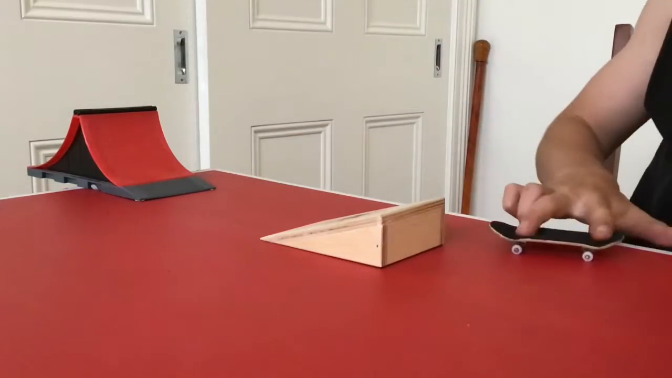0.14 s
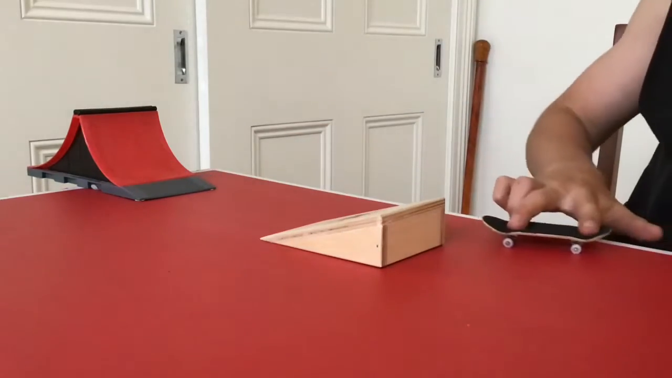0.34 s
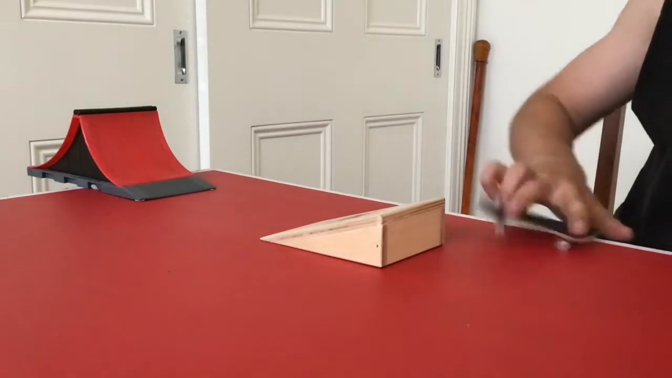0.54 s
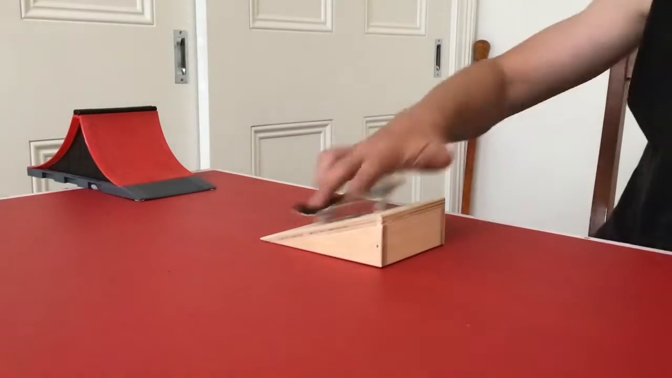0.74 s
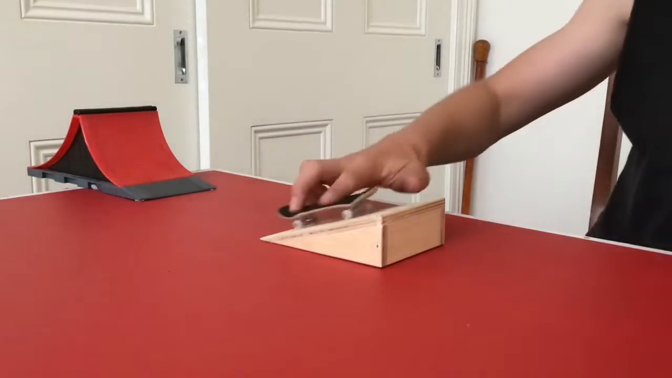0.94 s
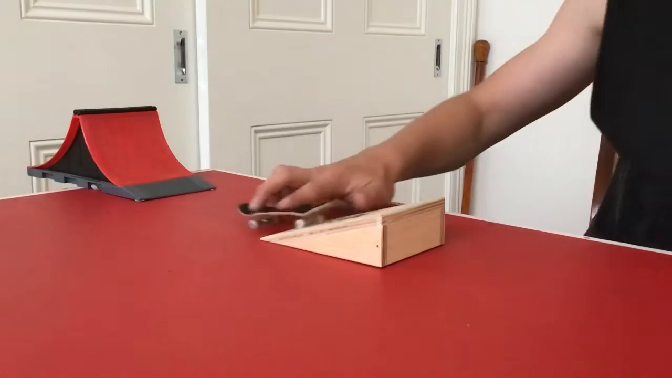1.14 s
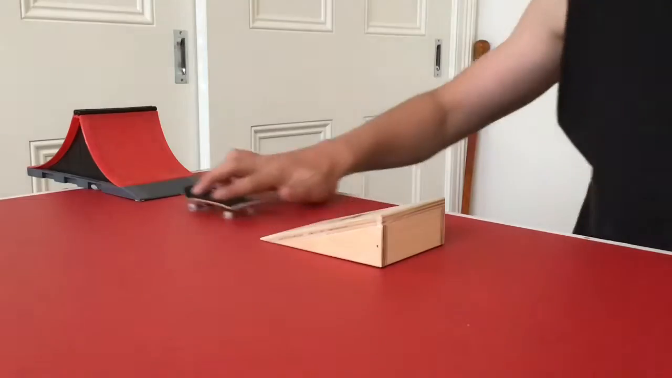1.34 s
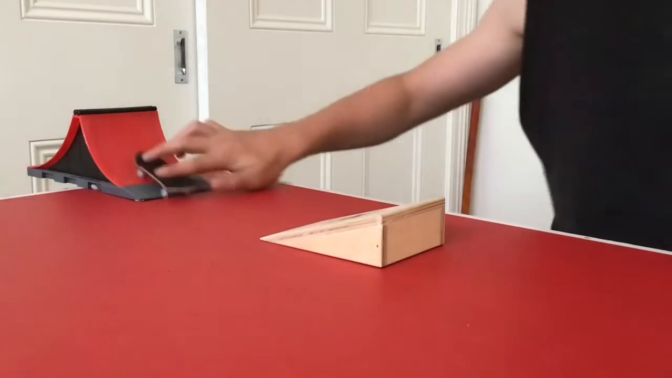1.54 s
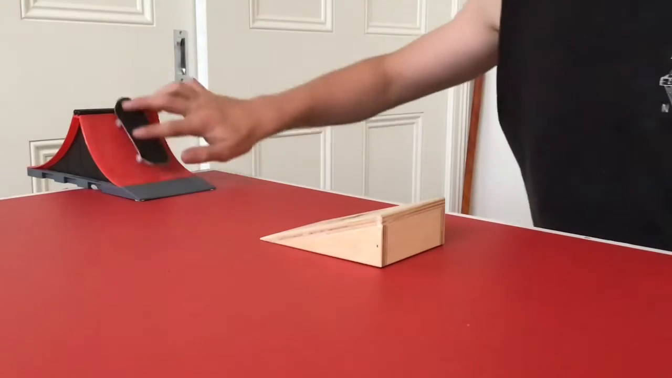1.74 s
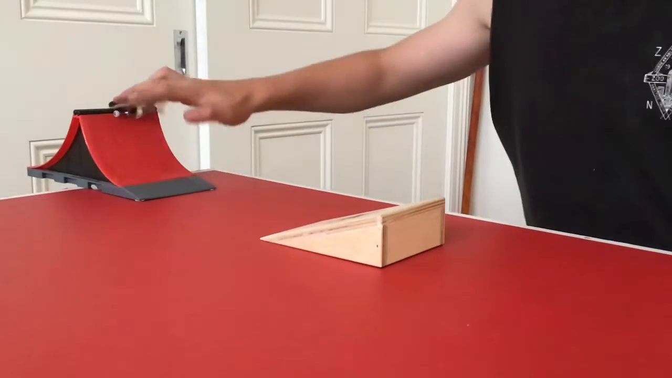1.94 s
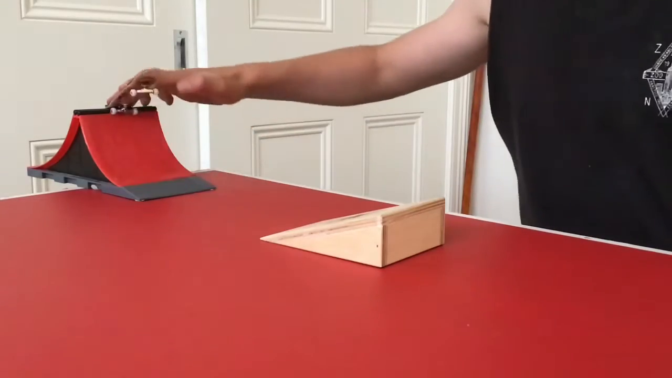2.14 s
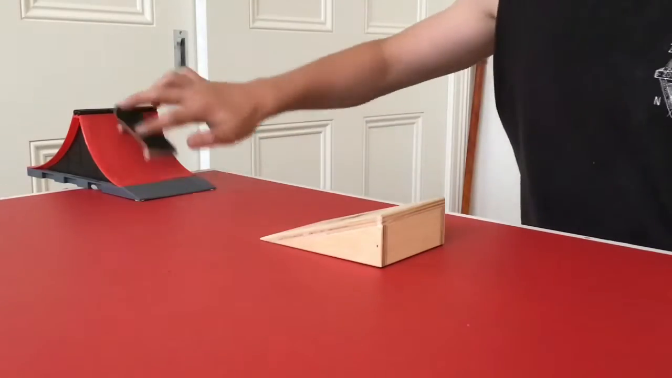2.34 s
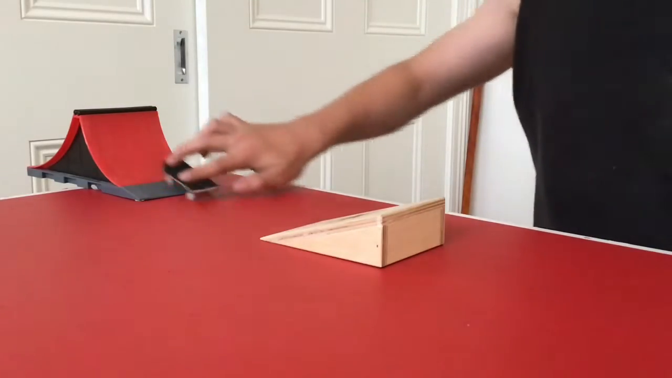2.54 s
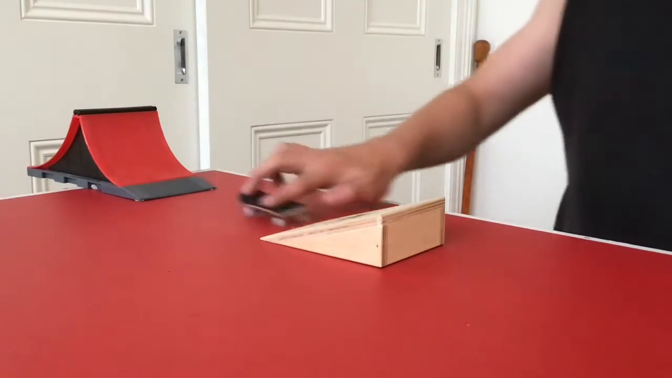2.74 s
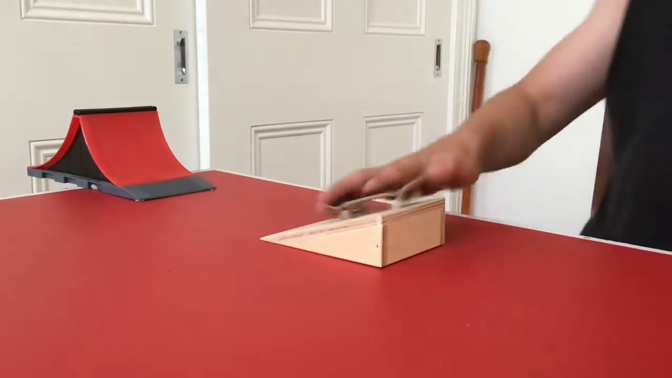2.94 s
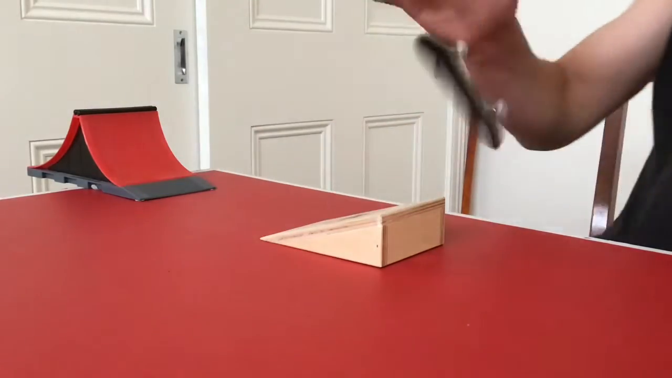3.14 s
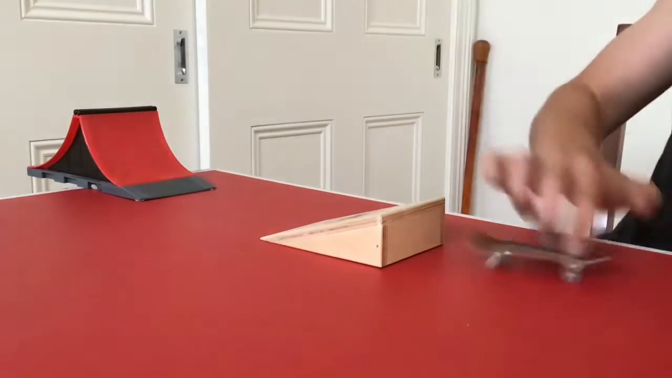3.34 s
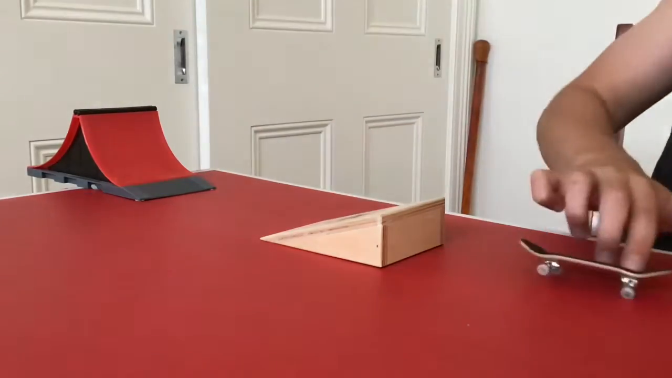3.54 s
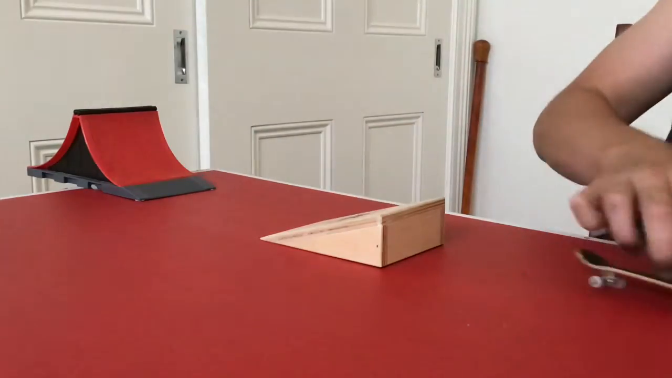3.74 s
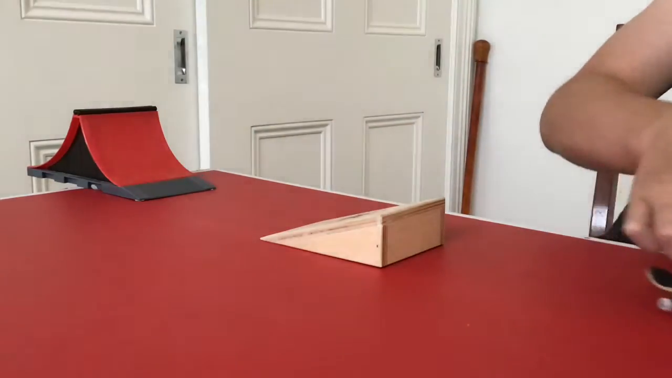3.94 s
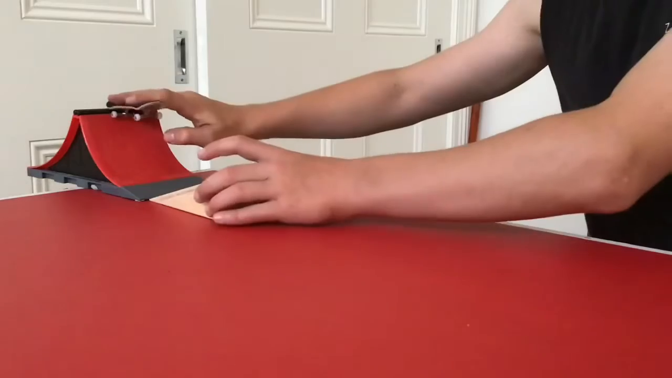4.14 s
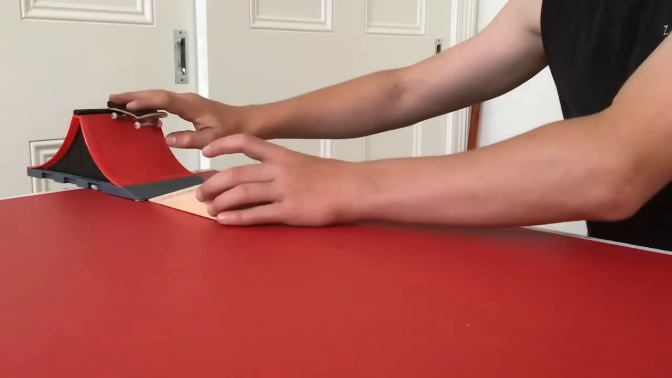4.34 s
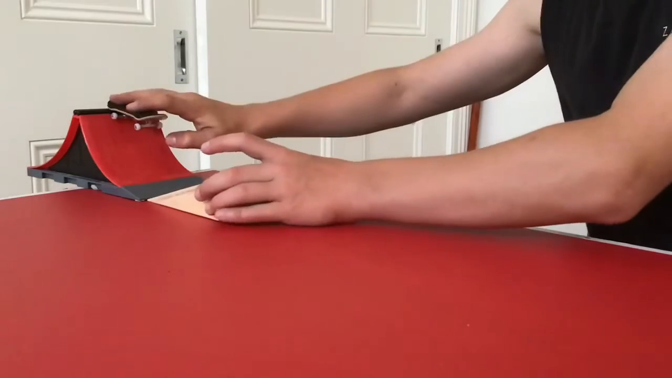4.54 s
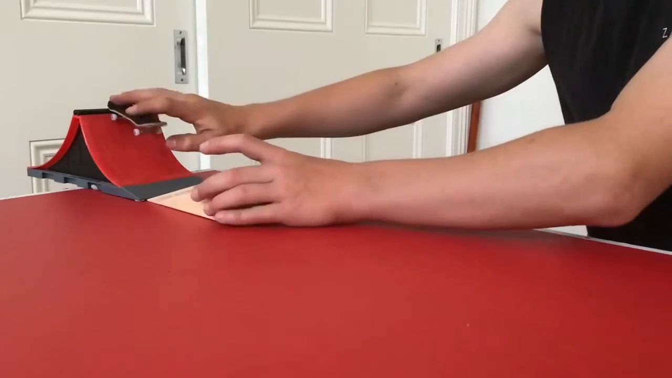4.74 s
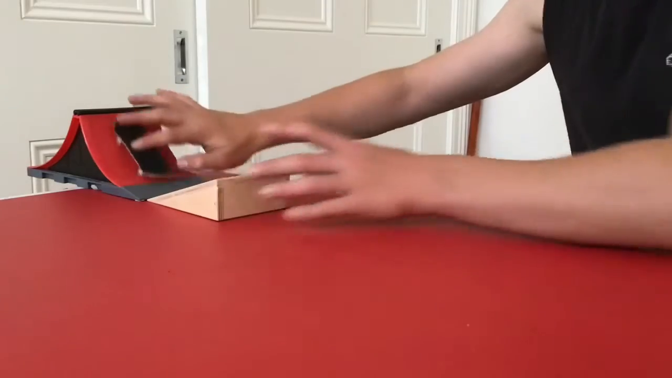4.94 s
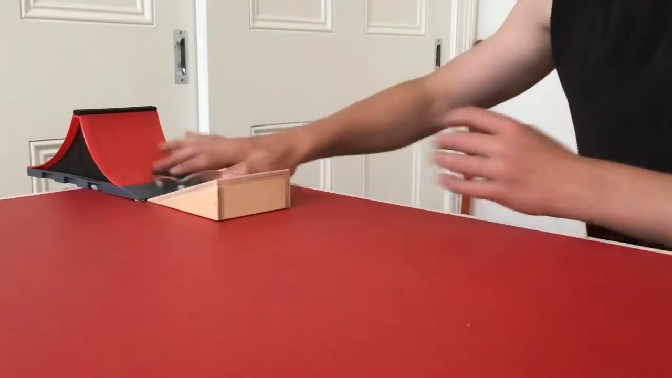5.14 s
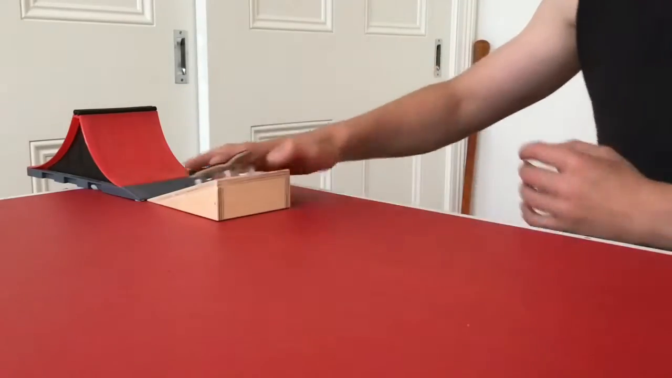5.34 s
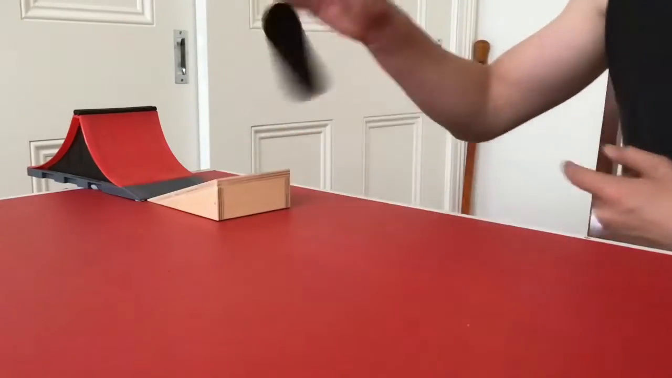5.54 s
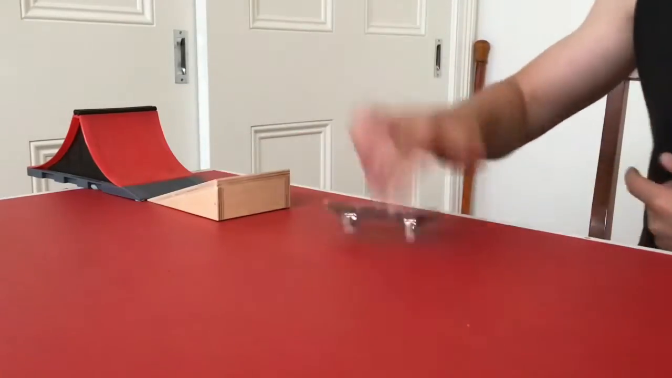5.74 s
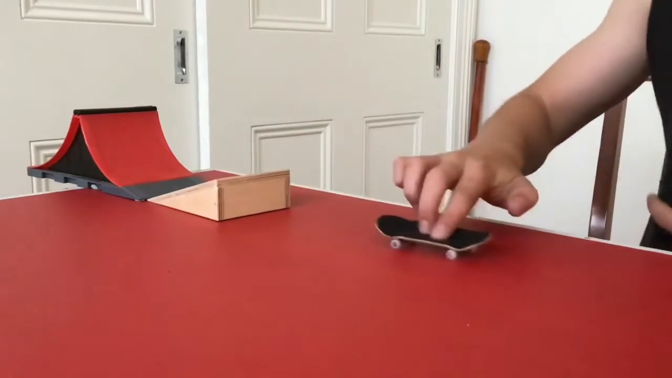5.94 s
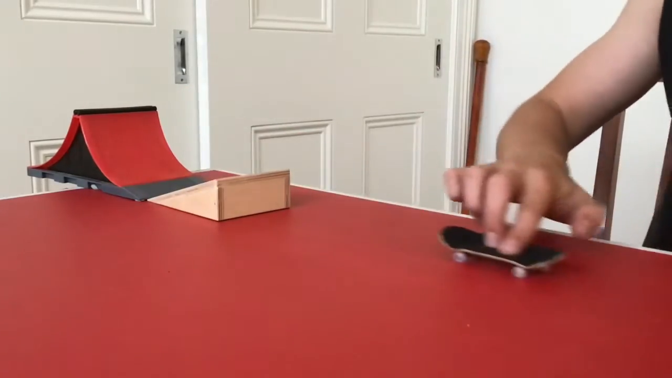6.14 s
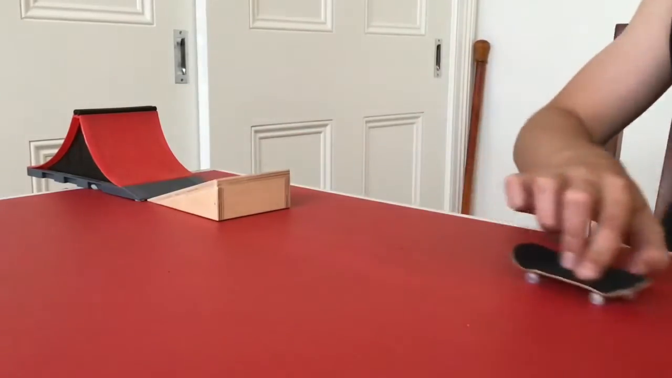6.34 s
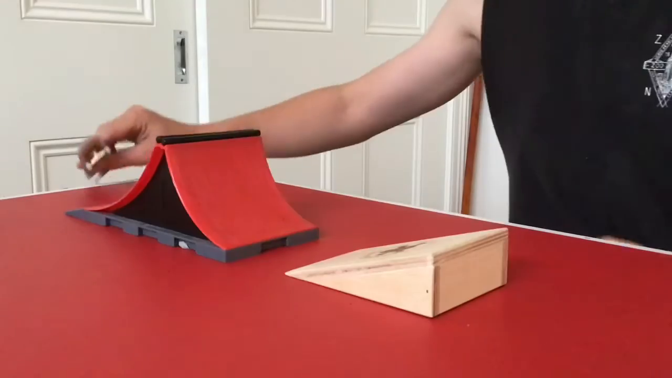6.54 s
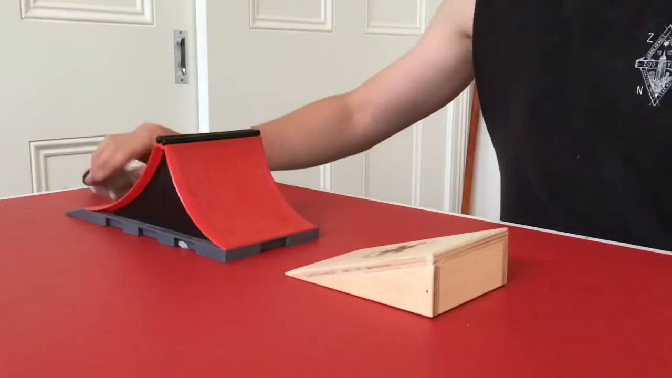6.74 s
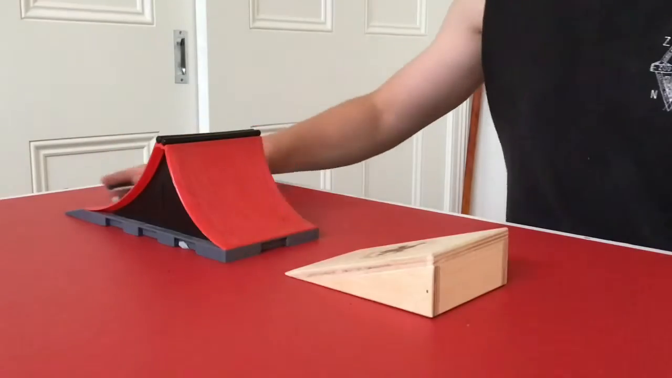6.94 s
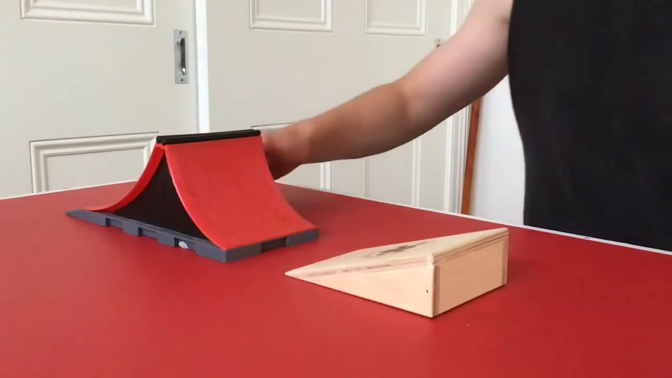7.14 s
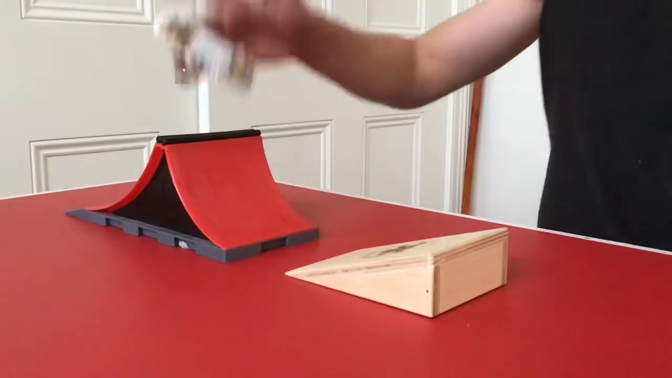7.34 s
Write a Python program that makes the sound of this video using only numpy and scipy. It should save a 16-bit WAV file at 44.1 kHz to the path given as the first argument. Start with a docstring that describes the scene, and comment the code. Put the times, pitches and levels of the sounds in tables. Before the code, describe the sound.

Miniature skateboard wheels hiss and scrape across a table, a wooden wedge and a hollow plastic ramp, heard close with short room echoes. Sharp dry snaps of the tail lead to hard wheel slaps and rapid rattling bounces, once early, once near the middle and loudest later. Between them are light seam ticks, quiet finger rubs and soft thumps. Sound briefly dips between attempts, and the last stretch brings hollow knocks and coarse rolling.

```python
"""A fingerboard rolls over a wooden table, a wooden wedge and a plastic ramp in a small room.
Wheel grit and rubs, and every pop, landing, bounce, seam, knock and thump, shake the same six bodies:
table top, wedge, ramp, deck, metal trucks and bare contact fizz. Each body rings at its own pitches.
A small room answers with echoes, over a low steady murmur of the house.
Three times the level dips briefly and comes back."""
import sys
import numpy as np
from scipy import signal
from scipy.fft import rfft, irfft, next_fast_len
from scipy.io import wavfile
from scipy.ndimage import uniform_filter1d, map_coordinates

SR = 44100
rng = np.random.default_rng(int(sys.argv[2]) if len(sys.argv) > 2 else 0)


def inscribe(sig):
    """Save sig as 16-bit PCM at rate SR to the path in sys.argv[1].

    A 1-D sig is mono; a 2-D sig holds one channel per row.
    Samples are clipped to [-1, 1] before scaling.
    """
    pcm = np.round(np.clip(np.atleast_2d(sig).T, -1, 1) * 32767)
    wavfile.write(sys.argv[1], SR, pcm.astype(np.int16))


N = 325458
TIME = np.arange(N) / SR  # s

# murmur of the house, its tone colour: f/Hz, level per Hz/dB
AIR = [(20, -45), (34, -23), (50, -9), (70, -5), (150, -13.5), (400, -22), (800, -29), (1100, -32.5),
       (2500, -34), (6000, -39.5), (13000, -45), (16000, -48)]
# how long the room rings at each pitch: f/Hz, time to fall by 60 dB t60/s
ROOM = [(100, 0.39), (260, 0.17), (700, 0.39), (1840, 0.33), (4850, 0.31), (12800, 0.24)]
# moments when all echoes stop, at the bottom of two of the dips: t/s
BREAKS = [4.106, 6.54]
# brief dips of the whole sound: t/s, gain/dB
FADES = [(0, 1.5), (.05, -5.5), (.09, -6.5), (.11, -2), (4.085, -0.5), (4.106, -18), (4.125, -5),
         (6.505, 4.5), (6.538, -15.5), (6.56, -3.5)]

# resonances of the six bodies: f/Hz, width/Hz, strength level/dB
TABLE = [(97, 23, -14), (171.7, 79, -9), (242, 79, -5), (305, 50, 0), (402, 150, -4)]
WEDGE = [(517, 118, -5), (604, 69, -2.5), (743, 110, -3)]
RAMP = [(1110, 280, -5.5), (1527, 340, -1), (1998, 560, -1), (2488, 390, -2)]
DECK = [(2804, 230, 3.5), (3374, 500, 1)]
TRUCKS = [(3990, 540, -2.5), (5020, 576, 2), (5520, 700, 0.5), (6570, 1000, -7), (7350, 450, -13)]
FIZZ = [(8400, 3300, -0.5), (13250, 810, 3), (15700, 6200, -5.5)]

# rolling, one table per run: t/s, wheel load as a base level/dB,
# then ramp, metal and table top against the wood, level/dB each
ROLLS = [
    [(0.14, -61, -5, -2, -12), (0.146, -47, -17, -17, -4), (0.156, -60, -6, -20, -2),
     (0.26, -47, -6.5, -26, -12.5), (0.326, -60, 1, -12, -18), (0.338, -50.5, -2, -17, -12),
     (0.366, -53.5, -9.5, -18, -21), (0.456, -54.5, -3.5, -11, -4), (0.556, -60, 0, -27, -6),
     (0.6, -79, -2.5, -34, 0)],
    [(0.96, -62.5, 11.5, -8, -2.5), (1.02, -54, -10, -4.5, -6.5), (1.356, -46.5, -0.5, -8, -4),
     (1.402, -41.5, -5, -9.5, -16), (1.466, -42.5, 0.5, -5.5, -7), (1.538, -39.5, -7, -11, -11),
     (1.59, -37.5, 3.5, -2, -3), (1.748, -40, 3.5, -5, -6), (1.854, -52.5, 8, -12, 1),
     (1.86, -54.5, 2, 7, -11)],
    [(2.33, -63, 2, -6, 3), (2.362, -55.5, -2.5, -15, -6), (2.5, -51.5, 10, 0.5, -3.5),
     (2.578, -36, 4, -9, -11.5), (2.59, -45, 5, -4.5, -5.5), (2.71, -30, 0, -5.5, -9.5),
     (2.72, -35, -9, -15.5, -4.5), (2.846, -44.5, 2.5, -1, -11), (3.014, -40, -11, -15, -5.5),
     (3.09, -53.5, -5, 2, -8.5)],
    [(3.6, -45.5, -8, -14, 2), (3.644, -58, -6, -6, -9.5), (3.722, -41, -18, -23, -1.5),
     (3.728, -55.5, -9, -11, -6), (3.766, -43.5, -15, -16, -6), (3.778, -49, -10, -16, -1.5),
     (3.806, -46.5, -14.5, -15.5, -9.5), (4.018, -47, -7, -12.5, -9.5), (4.09, -48, -7, -13.5, -9.5),
     (4.11, -85, -7, -18, -1)],
    [(4.9, -83.5, 7.5, -4, 4.5), (5.0, -53.5, 3, -9.5, -6.5), (5.194, -37.5, 6.5, -3.5, -7.5),
     (5.218, -36, -4.5, -11.5, -0.5), (5.272, -39.5, 11, -2.5, -8), (5.294, -34.5, 2.5, -7.5, -7.5),
     (5.306, -48, 0, -9, -2), (5.392, -50.5, -2, -10, -2), (5.418, -47, -12, -14, -13),
     (5.49, -50.5, -0.5, -6, -1)],
    [(5.98, -51, 9, -5, -6), (5.988, -52, -4, -17, -7.5), (6.06, -59, -1, -8, -3),
     (6.152, -50, -3, -12, -11.5), (6.252, -55.5, -4, -4.5, -6), (6.294, -51.5, 0.5, -9, -6.5),
     (6.498, -55, -1, -9.5, -5), (6.51, -47.5, -3, -6, -8), (6.532, -55, 1, -18, -7),
     (6.54, -75, -15, -23, -7)],
    [(6.69, -58.5, -1, -10, 1), (6.83, -59, 5.5, 1.5, -3), (6.898, -59.5, 6, -11, -3),
     (6.918, -36, 2.5, -5, -4), (6.974, -42.5, 11, -8.5, 6.5), (6.996, -36.5, -8, -6.5, -2),
     (7.106, -39.5, 4, -8.5, -2), (7.204, -31, -4.5, -17.5, -9), (7.342, -45, 0.5, -10, -4.5),
     (7.38, -31, -2, -1, 1)],
]
# short rubs of fingers, wheels and tail; the first row is an earlier sound dying away:
# t/s of the peak, peak load as a base level/dB, rise/s, fall/s,
# ramp against the wood level/dB, metal against the wood level/dB
SCUFFS = [(0.0, -56, .01, 0.12, -6, -9.5), (0.112, -52.5, .005, 0.02, -8, -5),
          (0.689, -43.5, 0.058, 0.0091, 1, -7.5), (1.99, -59.5, 0.016, 0.078, 7, -22),
          (2.068, -54.5, 0.012, 0.091, -1, -14), (2.25, -66, .02, 0.074, -12, -18),
          (4.136, -60.5, .006, .09, -8.5, -11), (4.258, -68, 0.034, .15, -31, -32),
          (4.463, -54.5, .02, 0.12, -17.5, -20), (4.596, -52.5, 0.013, 0.058, -18, -22),
          (4.664, -58.5, .015, .04, -14, -23.5), (4.78, -64, .01, 0.044, -21.5, -26.5),
          (4.82, -71, .03, 0.071, 0, -13), (6.8, -56, .025, .07, 9, 1)]
# how each body follows the rolling: level over the load/dB, share of the ramp column,
# share of the metal column, share of the table column, growth with load/dB per dB
SHAKE = {"table": (-1.5, 0.12, -0.21, 1, 1), "wedge": (-3.5, 0.1, 0.02, -0.4252, 0.8475),
         "ramp": (0.22, 1.064, 0.12, 0.026, 1.034), "deck": (-1, 0.28, 0.66, 0.32, 1.0935),
         "trucks": (0.3, 0.078, 1.27, 0.02, 1.05), "fizz": (-10, 0.4, 0.88, 0.27, 1.2)}

# blows, one table per kind: t/s (the chatter starts LAG_S later), base level/dB,
# then thud in the wood, ring of the deck and mid clack against it, level/dB each
POPS = [(0.6903, -18.5, -11, -10.5, -15.5), (0.8747, -15, -14.5, -6.5, -22.5),
        (3.1033, -21, -16, -8, -20.5), (3.4602, -17, -19.5, -18, -17.5), (3.4639, -10.5, -8.5, -18, -11.5),
        (5.4994, -18.5, -16.5, -9, -18.5)]
LANDINGS = [(0.8435, -4.5, -21.5, -13.5, -24.5), (3.3844, -5, -9, -16, -10),
            (5.8319, 0, -20.5, -20.5, -18.5), (5.8361, -11, -15, -23.5, -12), (7.3637, -23, -7, -11, -5),
            (7.3718, -26, -5.5, -16, -9)]
BOUNCES = [(3.4432, -10, -21.5, -14, -13), (3.4685, -7, -18.5, -26, -20.5), (3.472, -12, -12, -9, -23.5),
           (5.8493, -20.5, -6.5, -7, -7), (5.876, -14.5, -7, -16.5, -34), (5.8837, -8.5, -24.5, -16.5, -10)]
SEAMS = [(0.1357, -31.5, -16, -21, -21), (1.0753, -36, -9, -14, -15), (1.1712, -22.5, -15.5, -15, -31),
         (1.3246, -17.5, -14.5, -17, -18.5), (1.8607, -34.5, -27, -17, -11), (2.5088, -23, -21, -23, -18),
         (2.5417, -24, -19, -28, -15), (2.626, -13.5, -16.5, -25, -27), (2.63, -23, -13, -22, -11),
         (2.697, -12, -17, -27, -24), (2.7041, -12, -24, -34, -24), (2.8881, -26, -11, -6, -13),
         (2.9449, -32, -3.5, 0.5, -14), (5.054, -26.5, -24, -16, -27), (5.1148, -27.5, -16, -19, -9),
         (5.2272, -25, -19, -13, -15), (5.2887, -22.5, -7, -23, -4), (5.297, -24.5, -9, -22, -3),
         (6.2058, -39, -22, -6, -19), (6.6676, -26.5, -17.5, -8, -13), (6.9113, -21, -8.5, -17, -20)]
KNOCKS = [(1.5844, -19.5, -32, -29, -11.5), (1.9575, -39, -10, -6, -9.5), (1.9694, -28, -17, -11, -14),
          (2.0622, -33, -24, -16, -15), (2.317, -50.5, -16.5, -6.5, -7), (2.355, -39.5, -7, -11, -7.5),
          (2.3789, -36.5, -12, -9, -9), (5.1905, -22, -13, -22, -6), (5.2002, -22.5, -24, -20, -10.5),
          (6.3709, -42, -15, -8, -4), (6.8695, -16.5, -27, -18, -17), (6.8833, -26.5, -14, -8, -3),
          (7.0056, -22, -2, -12, -12), (7.0336, -23, -6.5, -20, -16), (7.1578, -20.5, -4.5, -17, -9.5)]
THUMPS = [(0.11, -48, -4, -7, -19), (0.224, -40, -2, -13, -21), (3.812, -39.5, -3, -23, -22),
          (4.776, -55.5, -3, -29, -17)]
# colour of each kind: pops (tail or nose slaps down), landings (wheels slam down), bounces (board
# rattles on), seams (a wheel ticks over an edge), knocks (hollow ramp), thumps (soft, on wood).
# Columns: blow table, time for the chatter to peak t/s, near push against the blow level/dB,
# then level/dB added in ramp, table, wedge, deck, trucks, fizz
KINDS = [(POPS, 0.00095, -7, 4.3, 6, 2.7, 3.4, -8, -12),
         (LANDINGS, .001, -0.39, 4.8, 0.93, 3.5, 5, -11.5, -25.5),
         (BOUNCES, 0.0014, -3.5, -0.88, 0.92, 3.6, 0.96, -7, -22),
         (SEAMS, .0013, -2, 0.54, -1.5, 1, 2.2, -10, -31.5),
         (KNOCKS, 0.0014, -4.5, 2.8, -6, 2, 2.4, -11.5, -27.5),
         (THUMPS, 0.0011, -0.5, 0.78, -12, 3.4, 1, -34, -33)]

AIR_DB = -66  # middle level of the murmur
TOP_HZ = 15900  # the treble ends here
LAG_S = .0003  # short wait before each blow's chatter starts
RUB_BASS_DB = 0.5  # table top in the SCUFFS rows, over the wood
RISE_DEPTH_DB, SCUFF_DEPTH_DB = 28.5, 18  # load of a SCUFFS row under its peak, at its start and end


def amp(db):
    """Turns a level in dB into a gain."""
    return 10 ** (np.asarray(db) / 20)


def unit(x):
    """Scales a sound to an average strength (rms) of 1."""
    return x / np.sqrt(np.mean(x ** 2) + 1e-20)


def along(points, hz):
    """Reads a curve of (Hz, value) points on a log pitch axis."""
    f, value = np.transpose(points)
    return np.interp(np.log(hz + 1), np.log(f + 1), value)


def wobble(rate):
    """A smooth random curve with `rate` random points a second."""
    knots = rng.standard_normal(int(N * rate / SR) + 4)
    return map_coordinates(knots, [TIME * rate])


def filtered(x, response):
    """Passes x through a filter given as a complex response over frequency."""
    size = next_fast_len(len(x) + 8192)  # spare room, so that ringing does not wrap round
    spectrum = rfft(x, size) * response(np.fft.rfftfreq(size, 1 / SR))
    return irfft(spectrum, size)[:len(x)]


def room_tone():
    """Low steady murmur of the house: coloured noise whose level drifts a little."""
    murmur = filtered(rng.standard_normal(N), lambda hz: amp(along(AIR, hz)))
    return amp(AIR_DB + 0.52 * wobble(20.0)) * unit(murmur)


def echo_tail():
    """Half a second of noise that dies away at its own speed at each pitch, as echoes do."""
    hz, t, z = signal.stft(rng.standard_normal(SR // 2), SR, nperseg=256)
    decay = amp(-60 * t / along(ROOM, hz)[:, None])
    tail = signal.istft(z * decay, SR, nperseg=256)[1]
    return tail / np.linalg.norm(tail)


def room(x, gap=.004, piece=8192):
    """Diffuse answer of the room, `gap` seconds late; the board moves, so each stretch gets its own tail."""
    out = np.zeros(N + SR)
    stops = np.append(np.round(np.array(BREAKS) * SR).astype(int), N)
    edges = np.union1d(np.arange(0, N, piece), stops)
    for start, end in zip(edges[:-1], edges[1:]):
        late = np.pad(x[start:end], (round(gap * SR), 0))
        wet = signal.fftconvolve(late, echo_tail())
        wet = wet[:stops[stops > start][0] - start]  # no echo outlives the next break
        out[start:start + len(wet)] += wet
    return out[:N]


def body(modes, only=None):
    """Resonances ring like small springs, all or `only` one; outside their range the body hardly radiates."""
    low, high = 0.77 * modes[0][0], 1.46 * modes[-1][0]  # Hz

    def response(f):
        ring = 0
        for k, (centre, width, db) in enumerate(modes):
            if only in (None, k):
                spring = 1j * f * width / (centre * centre - f * f + 1j * f * width)
                ring = ring + (-1) ** k * amp(db) * spring  # neighbours swing in opposite directions
        bass_cut = (f / low) ** 2 / ((f / low) ** 2 - 1 - 1j * f / low)
        treble_cut = 1 - (f / high) ** 2 + 1j * f / high
        return ring * bass_cut / treble_cut

    return response


def scuff_runs():
    """Each SCUFFS row as a short run whose load in dB climbs to a peak and sinks again."""
    runs = []
    for s, db, rise, fall, ramp, metal in SCUFFS:
        points = [(s - rise, db - RISE_DEPTH_DB), (s, db), (s + fall, db - SCUFF_DEPTH_DB)]
        runs.append([(at, level, ramp, metal, RUB_BASS_DB) for at, level in points])
    return runs


def controls():
    """Load, ramp, metal and table curves of all runs and scuffs; in an overlap the bigger load wins."""
    out = np.zeros((4, N)) - [[120], [0], [0], [0]]  # a load of -120 dB: almost silent
    for run in ROLLS + scuff_runs():
        s, *columns = np.transpose(run)
        on = np.flatnonzero((TIME >= s[0]) & (TIME < s[-1]))
        new = np.array([np.interp(TIME[on], s, column) for column in columns])
        out[:, on] = np.where(new[0] > out[0, on], new, out[:, on])
    return out


def rolling(modes, shake, drive, bumps, spread_db, lumps_db, shift_db):
    """Wheels tap random bumps (`bumps` a second); as they travel, each resonance swells and sinks alone."""
    tap_gain = amp(spread_db * np.minimum(rng.exponential(size=N), 3))
    taps = (rng.random(N) < bumps / SR) * rng.standard_normal(N) * tap_gain
    grit = unit(taps) + .7 * rng.standard_normal(N)
    sound = 0
    for k in range(len(modes)):
        swell = amp(shift_db * wobble(22))
        sound = sound + swell * filtered(grit, body(modes, only=k))
    over_db, *shares, growth = shake
    usual_db = -50  # load at which growth changes nothing
    level_db = usual_db + growth * (drive[0] - usual_db) + over_db + np.dot(shares, drive[1:])
    loudness = uniform_filter1d(amp(level_db) * unit(amp(lumps_db)), 200)  # smoothed over 200 samples
    return loudness * unit(sound)


def struck(modes, order, rattle, wet_db, thud=False, ring=False, clack=False):
    """A blow is a sharp push in a short swell of chattering contact; gives near sound and room feed."""
    near_push, room_push = np.zeros(N), np.zeros(N)
    chatter = np.zeros(N + 2048)
    t = np.arange(2048) / SR
    scale = np.abs(filtered(1. * (t == 0), body(modes))).max()  # peak of the body's answer to one click
    for rows, chatter_s, sharp_db, *colour_db in KINDS:
        u = t / chatter_s
        swell = u * np.exp(1 - u)
        for s, peak_db, thud_db, ring_db, clack_db in rows:
            level_db = peak_db + colour_db[order] + thud * thud_db + ring * ring_db + clack * clack_db
            size = amp(level_db) / scale
            start = round((s + LAG_S) * SR)
            chatter[start:][:len(t)] += size * rattle * swell * rng.standard_normal(len(t))
            hit = round((s + LAG_S + .0004) * SR)
            near_push[hit] += size * amp(sharp_db)
            room_push[hit] += size
    near = filtered(near_push + chatter[:N], body(modes))
    sent = amp(wet_db) * filtered(room_push, body(modes))
    return np.array([near, sent])


def board_rolling():
    """Six bodies under the wheels; finger pressure and wheel wobble make them all throb together."""
    throb = 0.42 * wobble(25) + 1.3 * wobble(70)
    drive = controls()
    fizz_lumps = 1.2 * throb + 4.5 * wobble(95)  # the fizz also flickers by itself
    return (
        rolling(TABLE, SHAKE["table"], drive, bumps=1000, spread_db=-3.0, lumps_db=0.37 * throb, shift_db=3.0)
        + rolling(WEDGE, SHAKE["wedge"], drive, bumps=900, spread_db=2.0, lumps_db=0.4 * throb, shift_db=3.65)
        + rolling(RAMP, SHAKE["ramp"], drive, bumps=1500, spread_db=-2.5, lumps_db=1.1 * throb, shift_db=2.5)
        + rolling(DECK, SHAKE["deck"], drive, bumps=1000, spread_db=-2.0, lumps_db=0.36 * throb, shift_db=-1.0)
        + rolling(TRUCKS, SHAKE["trucks"], drive, bumps=1500, spread_db=-1.5,
                  lumps_db=0.29 * throb, shift_db=-2.5)
        + rolling(FIZZ, SHAKE["fizz"], drive, bumps=700, spread_db=1.5, lumps_db=fizz_lumps, shift_db=1.8))


def board_blows():
    """Every blow shakes all six bodies; `order` picks the body's colour column in KINDS."""
    return (struck(RAMP, order=0, rattle=0.22, wet_db=2.5, clack=True)
            + struck(TABLE, order=1, rattle=0.07, wet_db=-3.5, thud=True)
            + struck(WEDGE, order=2, rattle=0.0037, wet_db=-4.5, thud=True)
            + struck(DECK, order=3, rattle=0.14, wet_db=-2.0, ring=True)
            + struck(TRUCKS, order=4, rattle=0.31, wet_db=1.8)
            + struck(FIZZ, order=5, rattle=0.5, wet_db=11.5))


def scene():
    """Adds up the near sound of the board, the room's answer and the murmur."""
    roll = board_rolling()
    blows, sent = board_blows()
    near = amp(-1.5) * roll + blows
    echoes = room(amp(-5.0) * roll + sent)
    return (near + echoes + room_tone())[None]


def record(dry):
    """Brief level dips, then soft rounding of loud peaks, then a steep end to the treble."""
    faded = dry[0] * amp(np.interp(TIME, *np.transpose(FADES)))
    clipped = faded / (1 + np.abs(faded / .93) ** 6) ** (1 / 6)  # rounds peaks off towards .93
    return filtered(clipped, lambda hz: 1 / (1 + (hz / TOP_HZ) ** 150))[None]


dry = scene()
out = record(dry)
inscribe(out)
```